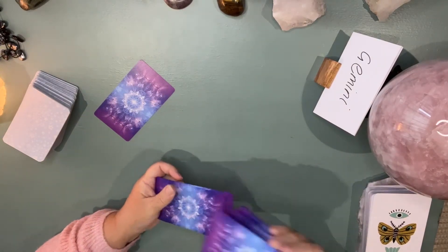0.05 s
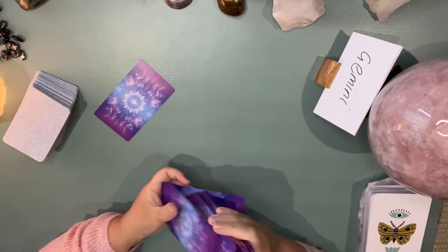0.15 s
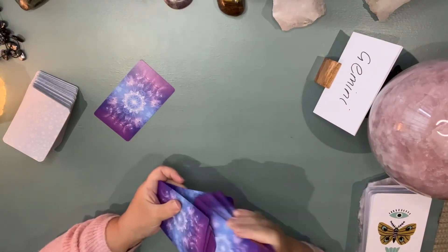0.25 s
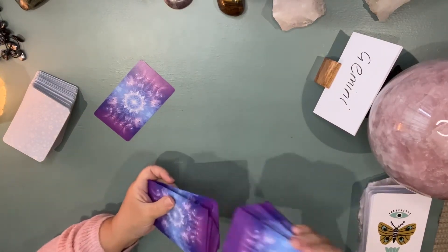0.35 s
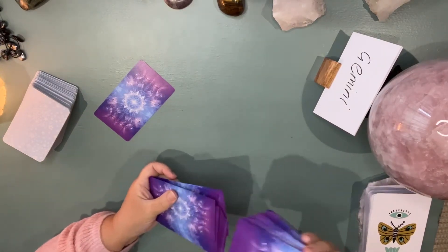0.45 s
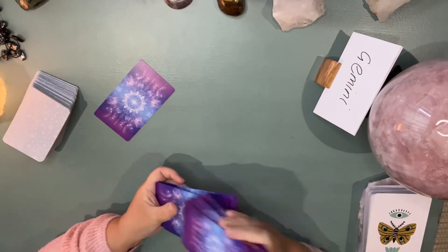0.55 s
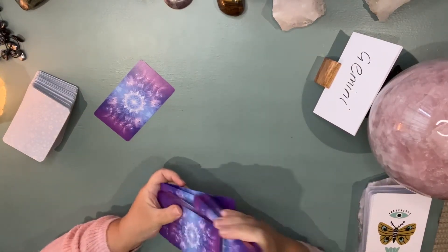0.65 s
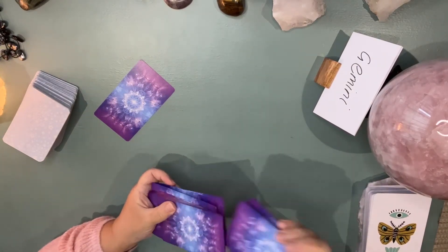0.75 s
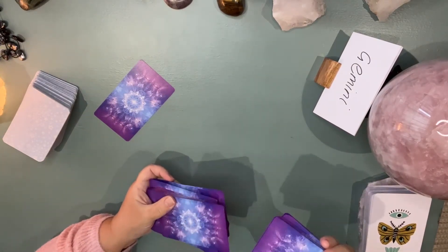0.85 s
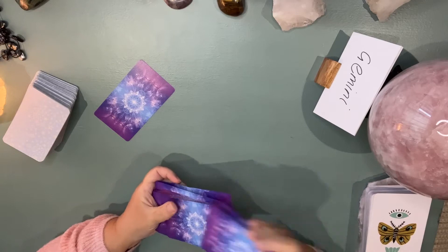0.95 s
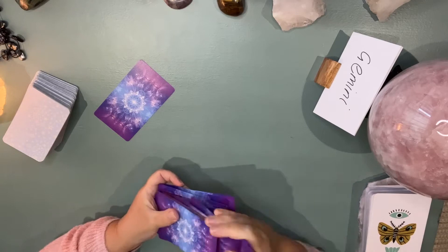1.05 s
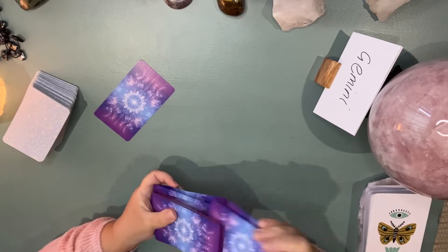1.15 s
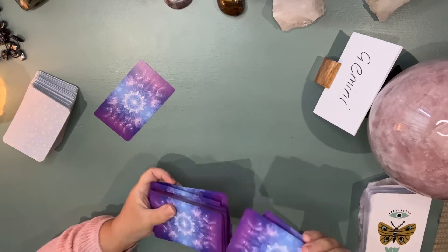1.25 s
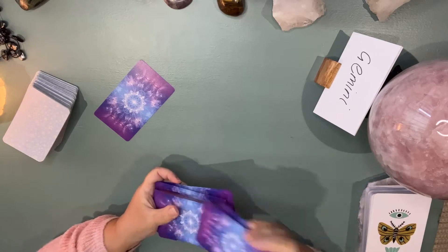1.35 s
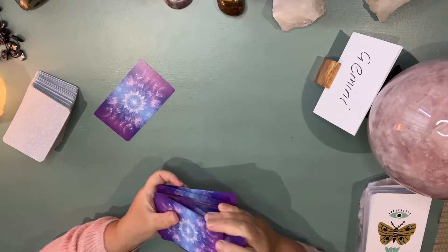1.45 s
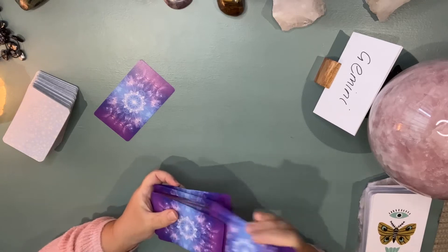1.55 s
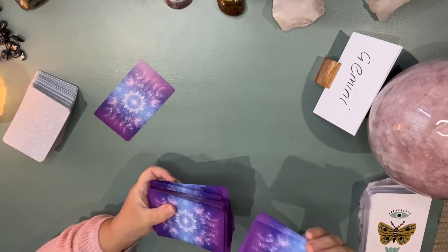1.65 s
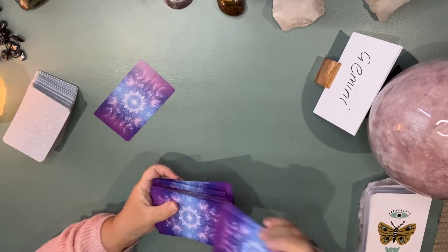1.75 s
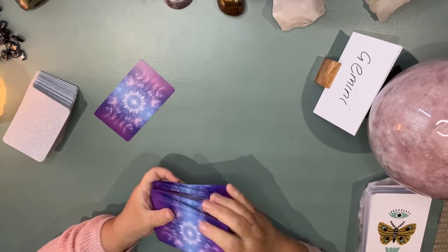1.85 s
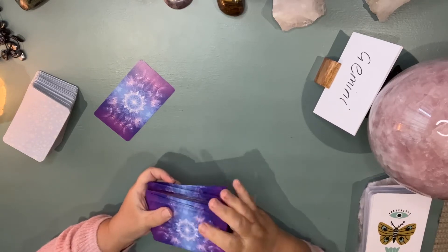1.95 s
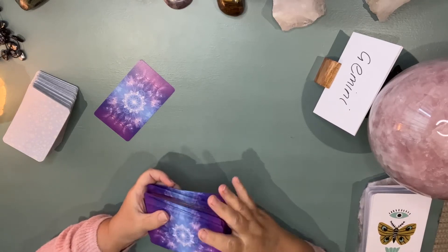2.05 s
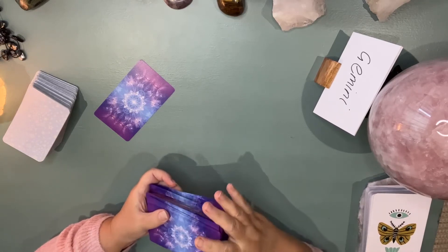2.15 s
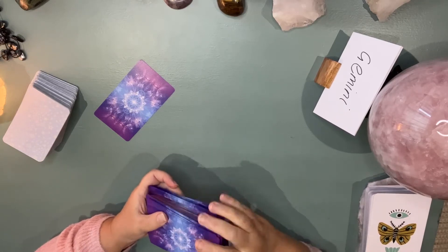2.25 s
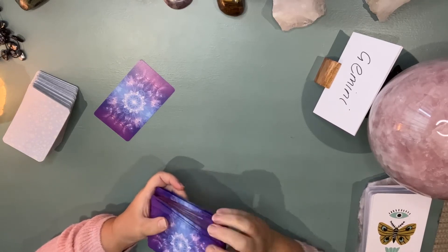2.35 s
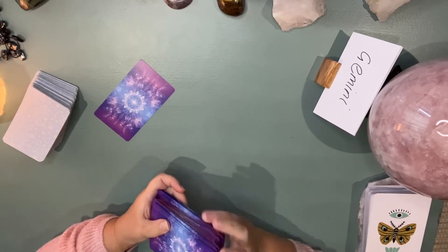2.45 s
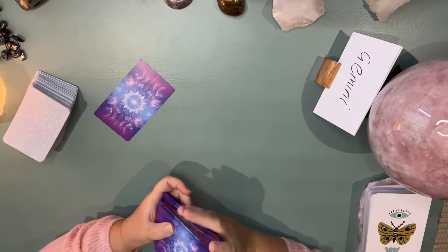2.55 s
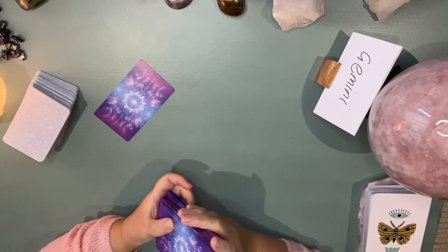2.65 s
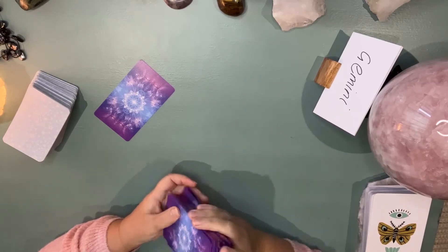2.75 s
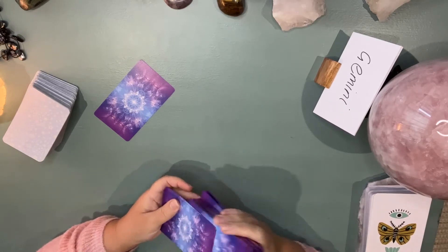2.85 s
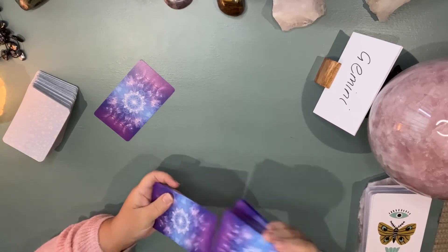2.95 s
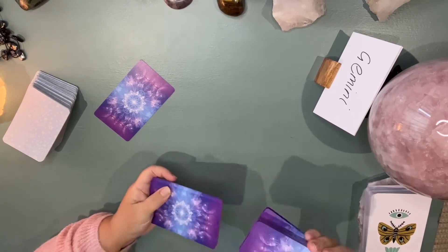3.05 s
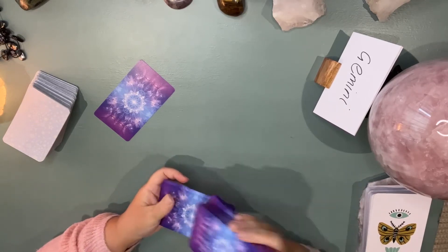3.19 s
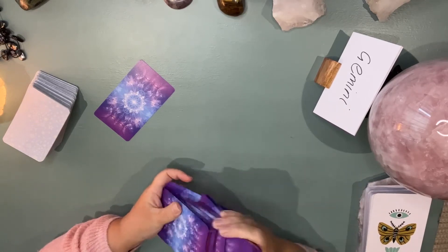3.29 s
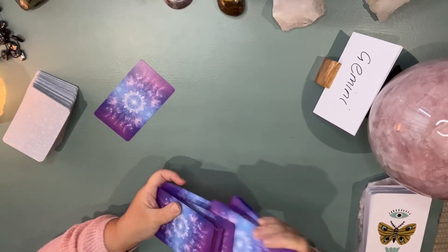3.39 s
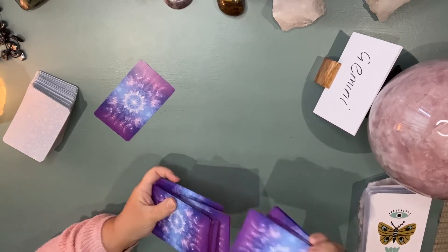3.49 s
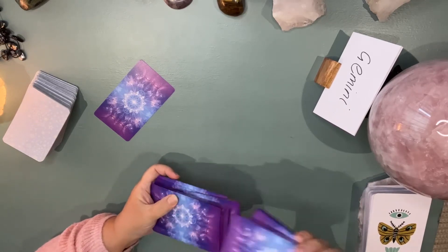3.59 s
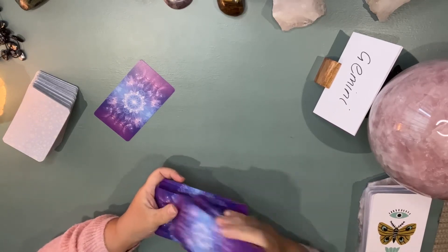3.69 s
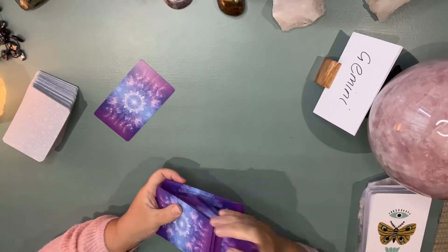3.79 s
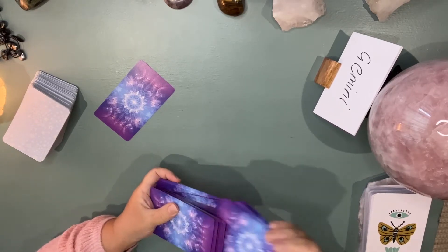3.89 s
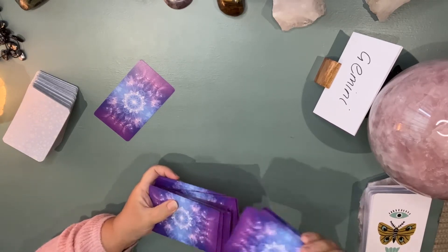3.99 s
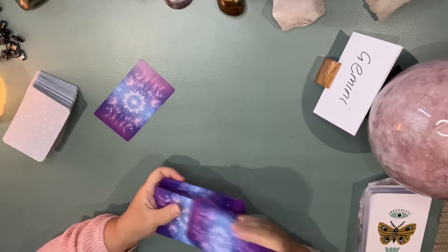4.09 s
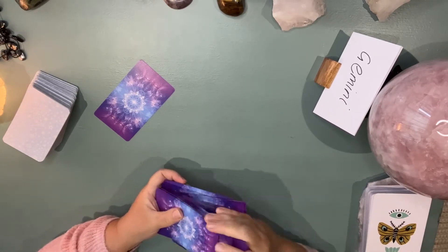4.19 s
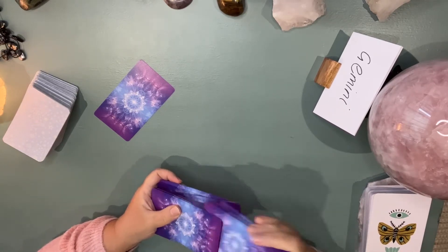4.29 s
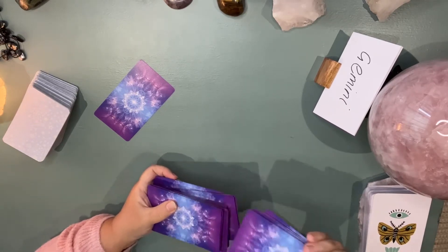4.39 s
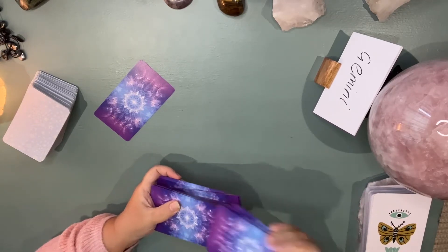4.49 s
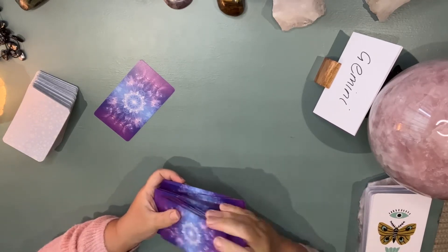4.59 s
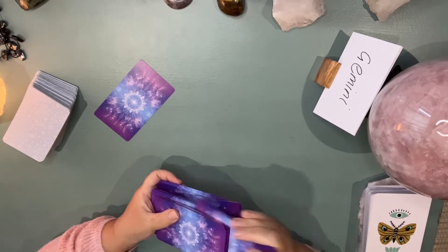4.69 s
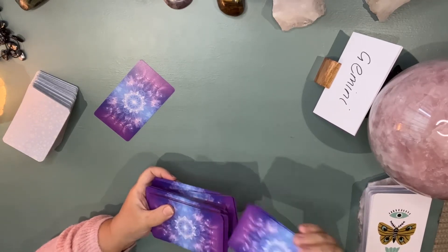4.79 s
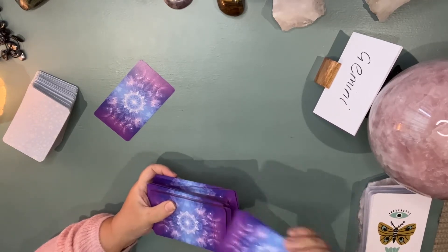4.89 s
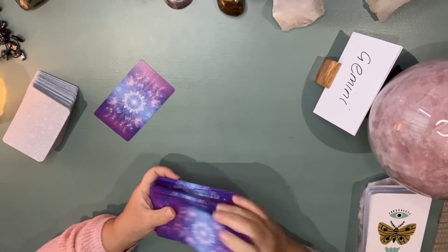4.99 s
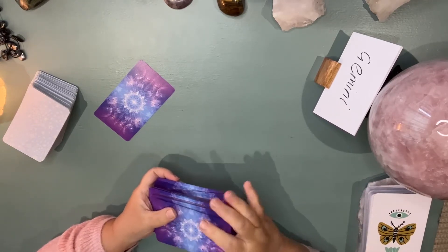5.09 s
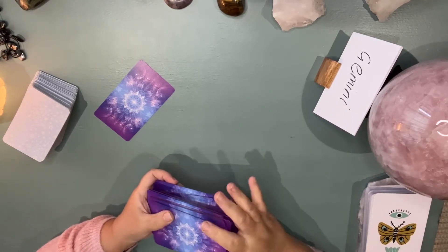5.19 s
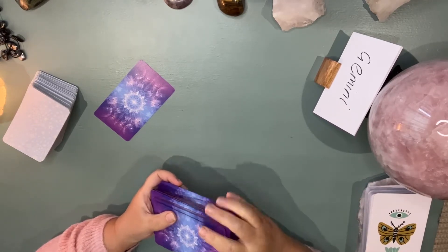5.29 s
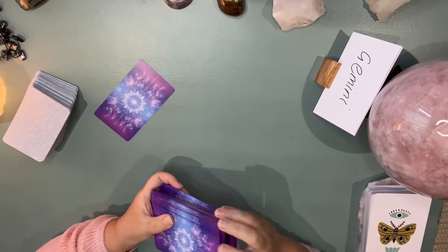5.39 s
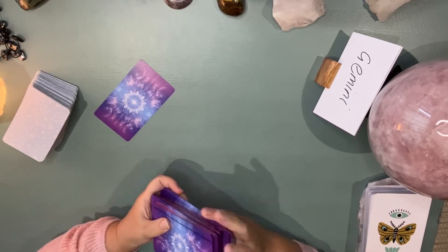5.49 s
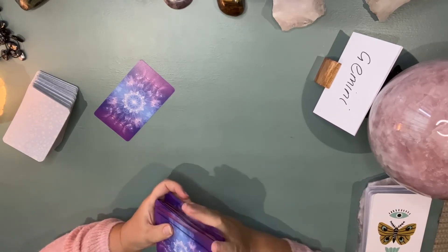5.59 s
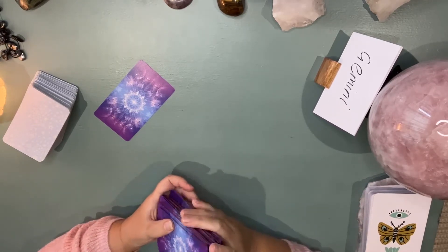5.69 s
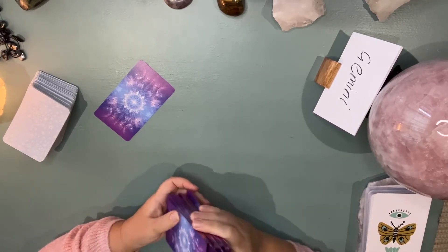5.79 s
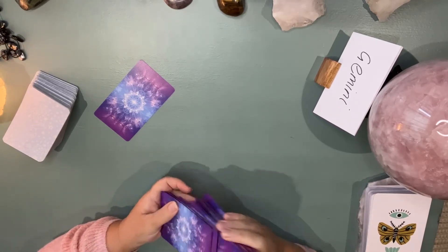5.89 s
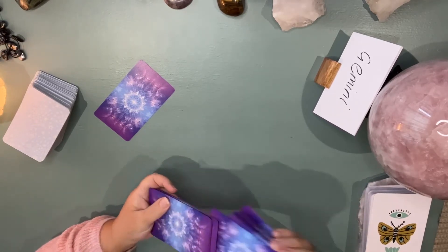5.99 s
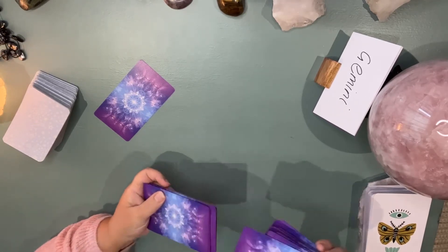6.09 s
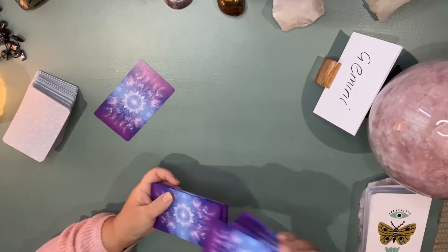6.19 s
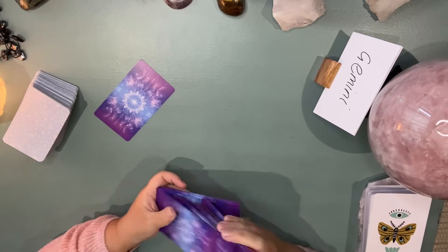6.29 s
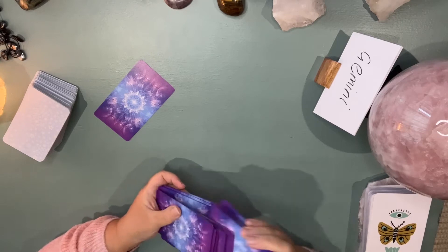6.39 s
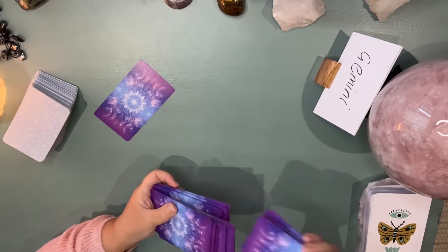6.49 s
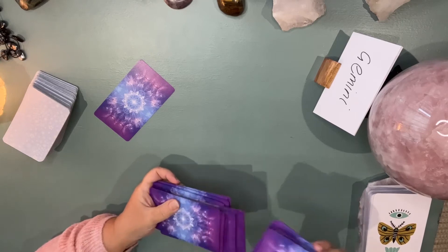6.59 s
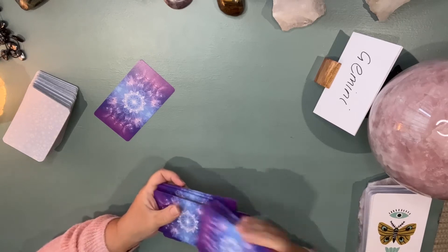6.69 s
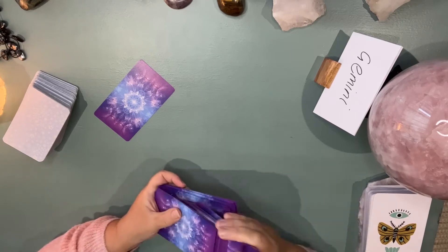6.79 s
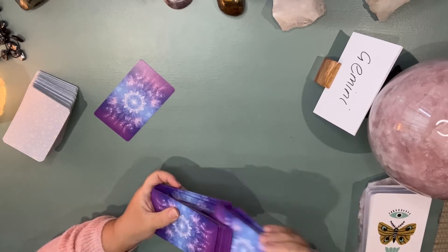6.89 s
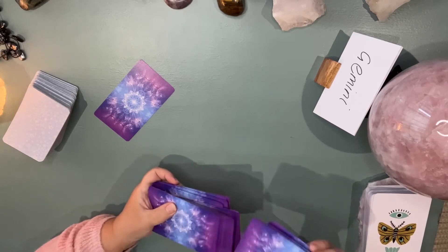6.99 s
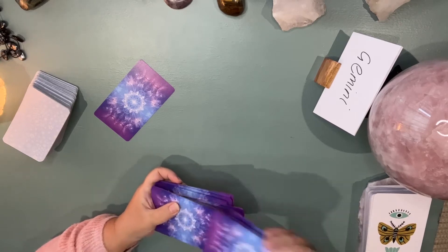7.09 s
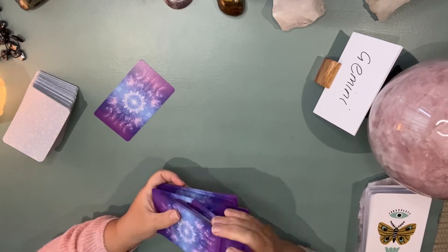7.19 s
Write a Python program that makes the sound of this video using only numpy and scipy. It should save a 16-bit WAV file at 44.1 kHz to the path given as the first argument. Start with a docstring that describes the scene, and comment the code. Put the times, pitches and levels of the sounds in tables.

```python
"""In a small soft room, two hands shuffle a deck of stiff glossy cards over a table, under a phone.
Packets slide together with a bright grainy hiss: noise that swells, sags and catches as the cards rub.
Edges slap and tick as short noise bursts through resonances; coarse drags stutter.
The deck thuds in the palm as waves that sink in pitch, and the table booms a little later.
The room rings on briefly as fading noise, over a faint hum of air made of coloured noise."""
import sys
import numpy as np
from scipy import signal
from scipy.fft import rfft, irfft, next_fast_len
from scipy.io import wavfile
from scipy.ndimage import uniform_filter1d

SR = 44100
rng = np.random.default_rng(int(sys.argv[2]) if len(sys.argv) > 2 else 0)


def wav_out(sig):
    """Save sig, one row per channel (or a flat mono array), as 16-bit PCM at SR to the path in sys.argv[1]."""
    wavfile.write(sys.argv[1], SR, np.round(np.clip(np.atleast_2d(sig).T, -1, 1) * 32767).astype(np.int16))


N = 319725
SIZE = next_fast_len(N + SR)  # transform length, with spare time at the end
HZ = np.arange(SIZE // 2 + 1) * SR / SIZE


def undb(db):
    """Turn decibels into a factor on the wave."""
    return 10 ** (np.asarray(db) / 20)


def level(x, db):
    """Set the rms level over all rows."""
    return x * undb(db) / np.sqrt(np.mean(x ** 2))


def colour(x, points):
    """Weight a sound's spectrum by a curve through (frequency [Hz], level [dB]) points."""
    hz, db = np.transpose(points)
    gain = undb(np.interp(np.log(HZ + 1), np.log(hz), db))
    return irfft(rfft(x, SIZE) * gain, SIZE)[..., :N]


def walk(rate):
    """Wander between random levels, rate [Hz] of them a second, with a spread a little under 1."""
    hold = int(SR / rate)
    steps = np.repeat(rng.standard_normal(N // hold + 1), hold)
    return uniform_filter1d(steps, hold)[:N]


def ring(x, hz, sharp):
    """Let one resonance respond to a sound; a higher sharpness rings longer."""
    b, a = signal.iirpeak(np.clip(hz, 30, 9000), sharp, SR)
    return signal.lfilter(b, a, x)


def bursts(s, db, hz, length, sharp, rise, knock_db, size):
    """Short contacts: noise bursts through a resonance each, over a broad knock.

    length [s] is the time to fade by 40 dB, rise a share of it; size [samples] is the room for each burst."""
    out, t = np.zeros((2, N + size)), np.arange(size) / SR
    for start, peak_db, pitch, fade_s, q in zip(*np.broadcast_arrays(s, db, hz, length, sharp)):
        attack = np.minimum(t / (rise * fade_s), 1) ** 2
        fade = np.exp(-np.log(100) * t / max(fade_s, .001))
        burst = rng.standard_normal((2, size)) * attack * fade
        knock_band = signal.butter(1, [pitch / 4, min(pitch * 3, 15000)], "band", fs=SR)
        knock = undb(knock_db) * signal.lfilter(*knock_band, burst)
        body = ring(ring(burst, pitch, max(q, .5)), pitch, 1.0) + knock
        i = int(start * SR)
        out[:, i:i + size] += undb(peak_db) * body / abs(body).max(axis=1, keepdims=True)
    return out[:, :N]


# the colour of the air hum: (frequency [Hz], relative level [dB per Hz])
AIR_COLOUR = [(25, -30), (45, -10), (68, -6.5), (110, -13.5), (300, -20.5), (1000, -27), (2500, -39),
              (6000, -40), (15000, -47)]
AIR_DB = -73  # rms


def air():
    """Faint hum of air: steady random pressure, strongest in the bass."""
    return level(colour(rng.standard_normal((2, N)), AIR_COLOUR), AIR_DB)


# how the room rings, band by band: (band centre [Hz], time to fade by 60 dB [s], level [dB])
ROOM_BANDS = [(114.5, 0.52, -2), (302, 0.37, 2.5), (491, 0.4, 3), (820, 0.39, 3.5), (2080, 0.52, 0.5),
              (4160, 0.44, -4.5), (8300, 0.34, -9.5), (13200, 0.25, -20.5)]


def room(x):
    """Dense reflections that start after a few ms and die sooner in the high treble."""
    t, tail = np.arange(SR) / SR, 0
    for hz, t60, db in ROOM_BANDS:
        edges = [hz / 2 ** .5, min(hz * 2 ** .5, .45 * SR)]  # one octave
        band = signal.butter(2, edges, "band", fs=SR, output="sos")
        arrival = np.clip((t - .003) / 0.00072, 0, 1)
        fade = np.exp(-np.log(1000) * t / t60) * arrival
        noise = signal.sosfilt(band, rng.standard_normal((2, SR)))
        tail = tail + undb(db) * noise * fade / np.sqrt(np.sum(fade ** 2))
    return irfft(rfft(x, SIZE * 2) * rfft(tail, SIZE * 2))[:, :N]


# the deck landing in the palm: (time [s], peak level [dB], starting pitch [Hz], table boom level [dB])
PALM_THUDS = [(0.178, -40.5, 500, -47.5), (0.311, -52, 750, -57), (0.45, -52.5, 300, -49.5),
              (0.73, -39, 697, -82), (1.043, -50, 447, -52), (1.335, -48, 750, -59),
              (1.573, -49.5, 604, -56), (1.883, -46.5, 355, -45), (1.917, -49, 590, -53.5),
              (2.921, -43, 950, -80), (3.223, -46.5, 775, -53), (3.396, -54.5, 336, -67),
              (3.448, -41.5, 730, -72), (3.7, -47, 930, -75), (3.908, -49, 300, -58), (4.32, -44, 750, -59),
              (4.519, -51.5, 644, -80), (4.898, -64, 700, -70), (4.947, -46.5, 720, -59),
              (5.994, -44.5, 840, -74), (6.269, -48.5, 760, -57), (6.301, -47.5, 543, -61),
              (6.448, -55.5, 298, -61), (6.659, -57, 650, -54), (6.703, -44.5, 776, -59),
              (7.092, -39, 846, -51.5)]
# counted in cycles of the starting pitch: until the pitch halves, and until the fade reaches 9 dB
SINK_CYCLES, FADE_CYCLES = 1.77, 2.12
TABLE_HZ = 77.3


def thuds():
    """Dull blows of the deck on skin that sink in pitch as the flesh yields; the table booms later."""
    size = 4096
    palm, t = np.zeros(N + size), np.arange(size) / SR
    for s, db, hz, _ in PALM_THUDS:
        cycles = t * hz
        fade = np.sqrt(cycles) * np.exp(-cycles / FADE_CYCLES)
        wave = fade * np.sin(2 * np.pi * SINK_CYCLES * np.log1p(cycles / SINK_CYCLES))
        i = int(s * SR)
        palm[i:i + size] += undb(db) * wave / abs(wave).max()
    s, _, _, boom_db = np.transpose(PALM_THUDS)
    boom = bursts(s + 0.006, boom_db, TABLE_HZ, 0.17, sharp=0.78, rise=0.058, knock_db=-8.5, size=16384)
    return palm[:N] * [[1], [0]] + boom  # the palm goes to the shared row only


# a packet dragging coarsely across card edges:
# (time [s], level before the stutter [dB], ring [Hz], length [s])
EDGE_DRAGS = [(1.903, -51, 1000, 0.26), (2.647, -49, 1180, 0.054), (2.663, -50, 2140, 0.013),
              (2.684, -39.5, 2230, 0.051), (2.698, -49, 2350, 0.074), (5.05, -47, 1000, 0.045),
              (5.669, -42, 2140, 0.068), (5.69, -43, 2380, 0.061), (5.671, -57, 1140, 0.046),
              (5.723, -47, 1150, 0.032), (5.718, -41.5, 2260, 0.048), (5.733, -42.5, 2700, 0.058)]


def scuffs():
    """Coarse drags that stutter as edge after edge lets go."""
    drags = bursts(*np.transpose(EDGE_DRAGS), sharp=2.8, rise=0.15, knock_db=-9, size=16384)
    return drags * undb(3.2 * walk(120))


# card edges meeting: (time [s], peak level [dB], ring [Hz], treble crack against that peak [dB])
EDGE_SLAPS = [(0.085, -38, 1590, -13), (0.094, -38.5, 910, -1), (0.113, -24, 1280, -16),
              (0.119, -27, 2070, -29), (0.131, -33, 1930, 4), (0.149, -24, 1900, -22),
              (0.177, -35.5, 607, 7), (0.28, -31, 596, 1.5), (0.299, -28.5, 2200, -21),
              (0.307, -25, 770, 1.5), (0.477, -45, 1080, -1.5), (0.516, -26, 1390, -27),
              (0.705, -32, 2100, -7.5), (0.721, -25, 3060, -24.5), (0.729, -24.5, 1440, -32),
              (0.937, -37.5, 1640, -28), (1.002, -21.5, 3050, 4.5), (1.333, -41, 393, -1),
              (1.564, -30.5, 1520, 2), (1.738, -39.5, 506, -17), (1.813, -34.5, 980, -8),
              (1.892, -39.5, 910, -11), (1.915, -36.5, 620, -17.5), (2.913, -36, 3750, -10),
              (2.92, -22.5, 2300, -36), (3.219, -18.5, 3700, 0.5), (3.229, -27.5, 1690, 9),
              (3.249, -28, 2040, -19.5), (3.378, -23.5, 2730, 3.5), (3.387, -31, 1980, -6),
              (3.447, -25.5, 2050, -2.5), (3.451, -38.5, 1070, -6), (3.494, -39, 1470, -6),
              (3.696, -30, 2180, -9), (3.901, -39, 1880, -13), (4.311, -39, 3120, 0),
              (4.089, -51.5, 1900, -10), (4.477, -47, 605, -63), (4.753, -34, 1400, 2.5),
              (4.783, -51, 1100, -30), (4.897, -39, 427, -1), (4.922, -43, 830, -3),
              (5.325, -48.5, 870, -2), (5.52, -51, 4050, 10), (5.993, -37, 1820, 8), (6.201, -45, 450, -23),
              (6.239, -45, 680, -17), (6.273, -33, 1980, -20), (6.3, -41, 960, -13),
              (6.445, -38.5, 2530, -4), (6.656, -40.5, 540, -19), (6.926, -30.5, 1840, -22),
              (7.07, -37, 585, -6)]
SLAP_S, CRACK_S = 0.01, 0.0049  # times to fade by 40 dB


def slaps():
    """Edge contacts: a short ring of the flexing packet and a treble crack."""
    s, db, hz, crack_db = np.transpose(EDGE_SLAPS)
    body = bursts(s, db, hz, SLAP_S, sharp=3.6, rise=0.25, knock_db=-3.0, size=2048)
    crack = bursts(s, db + crack_db, 4400, CRACK_S, sharp=1.0, rise=0.25, knock_db=-1.5, size=2048)
    return body + crack


def grit(spread_db):
    """Tiny slips of one surface over another, a few much larger than the rest; one row for each path."""
    sizes_db = spread_db * np.minimum(rng.exponential(size=N), 4)
    return rng.standard_normal((2, N)) * undb(sizes_db)


def patchy(x, depth_db, rate):
    """Each fifth of an octave wanders in level at random, giving the hiss an uneven, shifting colour."""
    spectrum, out = rfft(x, SIZE), 0
    place = np.clip(5 * np.log2(HZ / 1000 + 1e-9), 1, 19)  # the end bands take all that lies beyond
    for band in range(1, 20):
        share = np.clip(1 - abs(place - band), 0, 1)
        out = out + undb(depth_db * walk(rate)) * irfft(spectrum * share, SIZE)[:, :N]
    return out


# the colour of the duller scrape under the hiss: (frequency [Hz], relative level [dB per Hz])
SCRAPE_COLOUR = [(150, -30), (400, -14.5), (1000, -18), (1500, -5), (2200, 0), (3500, 4), (5500, 5.5),
                 (8000, 0), (12000, -9.5)]
NICKS_PER_S, NICKS_DB = 500, -4  # rms level against the smooth scrape


def nicks():
    """Single card edges snag: scattered dull ticks of uneven size."""
    snags = (rng.random(N) < NICKS_PER_S / SR) * undb(11 * rng.random(N))
    tick = rng.standard_normal((2, 48)) * np.exp(-np.arange(48) / 12)  # about 1 ms
    ticks = signal.oaconvolve(snags[None], tick)[:, :N]
    return level(colour(ticks, SCRAPE_COLOUR), NICKS_DB)


# the colour of the bright hiss: (frequency [Hz], relative level [dB per Hz])
HISS_COLOUR = [(3000, -39.5), (5500, -9), (8500, -1), (11500, 0), (13000, 5.5), (15800, -2)]
# each swell of pressure as card faces rub: (touch time [s], swell [s], ease [s],
# hiss level at the crest before the catching [dB], sag until the lift [dB], scrape against the hiss [dB])
FACE_RUBS = [(0.079, 0.018, 0.025, -56.5, -6, 1), (0.118, 0.017, 0.037, -33, 23, -10),
             (.155, 0.014, 0.14, -54.5, -3.5, -8.5), (0.51, 0.015, 0.076, -45.5, 3.5, -5),
             (.55, 0.035, 0.052, -37.5, 27, -11.5), (.612, 0.019, 0.078, -47, -8, -10),
             (0.931, 0.074, 0.089, -41.5, 43, -5), (1.023, 0.023, 0.12, -44.5, 12, -6.5),
             (1.316, 0.025, 0.024, -45, -3.5, -14), (1.364, 0.037, 0.036, -40, 44, -6),
             (1.413, 0.075, 0.1, -44, 21, -9), (1.734, 0.0078, 0.0081, -42, 2.5, -10.5),
             (1.755, 0.009, 0.042, -39, 14, -12.5), (1.811, 0.009, 0.013, -37.5, 14, -10),
             (2.163, 0.056, 0.12, -47.5, 23, -4), (2.375, 0.024, 0.05, -62.5, 9, -32),
             (2.449, 0.035, 0.059, -55, 25.5, -7.5), (2.55, 0.016, 0.096, -64.5, 21, 0.5),
             (2.634, 0.024, 0.06, -58, 4.5, 4), (2.693, 0.067, 0.2, -47.5, 8, -19.5),
             (2.885, 0.03, 0.02, -46, 19, -13.5), (3.148, 0.027, 0.04, -50.5, 0.5, 1),
             (3.221, 0.013, 0.069, -34.5, 30.5, -8.5), (3.28, 0.063, 0.074, -44.5, 4, -20),
             (3.385, .01, 0.058, -53.5, 18, -3), (3.46, 0.02, 0.055, -65, 0, 4),
             (3.631, 0.0072, 0.074, -36, 7.5, -10.5), (3.66, 0.023, 0.076, -41, 8, -4),
             (3.735, 0.024, 0.055, -39.5, 2, -13.5), (3.815, 0.0094, 0.036, -44, -0.5, -16.5),
             (4.034, 0.018, 0.035, -38, 1.5, -12), (4.075, 0.039, 0.027, -37.5, 18, -10.5),
             (4.14, 0.038, 0.13, -42, 15.5, -11.5), (4.474, 0.0095, 0.0076, -49, -17.5, -21),
             (4.511, 0.0055, 0.063, -34, 8.5, -14), (4.591, 0.066, 0.074, -40, 19, -15.5),
             (4.899, 0.0076, 0.011, -36.5, 4, -17), (4.921, 0.014, 0.12, -31.5, 38.5, -18.5),
             (5.07, 0.049, 0.021, -59.5, 25, -11.5), (5.155, 0.019, 0.033, -78.5, 27, 17),
             (5.21, 0.053, 0.1, -63, 25.5, 4), (5.429, 0.046, .008, -65, 0, -12),
             (5.482, 0.027, 0.017, -46, -4, -8), (5.55, 0.015, 0.16, -68.5, -2, 2),
             (5.733, 0.0062, 0.13, -59.5, -4, -6.5), (5.82, 0.052, 0.089, -50.5, -2, -24),
             (5.957, 0.026, 0.0082, -50.5, 9.5, -10), (6.195, 0.01, 0.03, -59, -13.5, -2),
             (6.223, 0.052, 0.041, -41, 1, -7.5), (6.32, 0.01, 0.11, -57, -1.5, -8.5),
             (6.655, 0.014, 0.012, -38.5, 11, -14), (6.676, 0.035, 0.041, -43.5, 2.5, -4.5),
             (6.765, 0.024, 0.098, -41.5, 30, -13), (6.886, 0.012, 0.024, -54.5, 13, -6),
             (7.069, 0.0068, 0.085, -46, -3, -9), (7.129, 0.038, 0.035, -40.5, 8, -8),
             (7.186, 0.026, .05, -43, -4, -8.5)]
SWELL_DB = 8.5  # how far under its crest a rub sets in
ROUNDNESS = 1.265  # 1 = pointed crest, 2 = a round one
# a rub fades in over a share of its swell, or over a fixed few ms if a slap falls within 10 ms
# of its start, and fades out as it lifts
GRIP_SHARE, STRUCK_GRIP_S, LIFT_S = 0.49, 0.0047, 0.0095


def slides():
    """Card faces rub: pressure swells, sags and lifts, and catches many times a second."""
    time = np.arange(N) / SR
    hiss_power, scrape_power = np.zeros(N), np.zeros(N)
    for s, swell, ease, hiss_db, sag_db, scrape_db in FACE_RUBS:
        crest, lift = s + swell, s + swell + ease
        near = slice(int(s * SR), int((lift + LIFT_S) * SR))
        t = time[near]
        struck = min(abs(slap[0] - s) for slap in EDGE_SLAPS) < .01
        grip_s = STRUCK_GRIP_S if struck else GRIP_SHARE * swell
        touch = np.clip(np.minimum((t - s) / grip_s, (lift - t) / LIFT_S + 1), 0, 1)
        away = np.interp(t, [s, crest, lift], [1, 0, 1]) ** ROUNDNESS  # 0 at the crest
        under_db = away * np.where(t < crest, SWELL_DB, sag_db)
        hiss_power[near] += (touch * undb(hiss_db - under_db)) ** 2
        scrape_power[near] += (touch * undb(hiss_db + scrape_db - under_db)) ** 2
    catch = undb(1.5 * walk(60) + 1.5 * walk(250))
    slips = patchy(grit(spread_db=2.2), depth_db=4.6, rate=22)
    hiss = np.sqrt(hiss_power) * level(colour(slips, HISS_COLOUR), 0)
    scrape = np.sqrt(scrape_power) * (level(colour(slips, SCRAPE_COLOUR), 0) + nicks())
    return catch * (hiss + scrape)


# the two microphone ports: (frequency [Hz], phase the left one leads by [rad],
# likeness [0-1], left minus right level [dB])
PORT_CURVES = [(60, 0, 0.7, -0.5), (199, 1, 0.13, -1), (634, 0.2, 0.26, -1.5), (1980, -1.14, 0.4, 0.5),
               (4260, -2, 0.32, -2.5), (6540, -2.5, 0.5, -5), (8025, -3, 1, 2), (10560, -1, 1, -1.5),
               (12450, 0.62, 1, 0.5), (14020, 2, 0.95, -1), (14550, np.pi, 1, 1.5)]


def ports(shared, apart):
    """What both ports share arrives shifted in phase; the rest differs in sign between them."""
    hz, *columns = np.transpose(PORT_CURVES)
    lead, like, pan_db = (np.interp(HZ, hz, column) for column in columns)
    like, side = np.clip(like, 0, 1), np.array([[1], [-1]])  # left, right
    common = np.sqrt((1 + like) / 2) * rfft(shared, SIZE)
    opposed = side * np.sqrt((1 - like) / 2) * rfft(apart, SIZE)
    shift = np.exp(.5j * side * lead) * undb(side * pan_db / 2)
    return irfft((common + opposed) * shift, SIZE)[:, :N]


def scene():
    """Add the sources, let them ring in the room over the air, and pick them up at both ports."""
    # row 0 is what both ports share; row 1 takes paths scattered by fingers, deck and table top
    blows = (thuds() + scuffs() + slaps()) * undb([[0], [-5]])  # a blow scatters less than a wide slide
    rubs = slides()
    wet = room(rubs + undb(-8.5) * blows)
    shared, apart = air() + wet + blows + rubs
    return ports(shared, apart)


TOP_HZ = 15750


def record(dry):
    """The phone cuts the top with a steep low-pass."""
    low_pass = signal.ellip(10, .2, 80, TOP_HZ, fs=SR, output="sos")
    return signal.sosfilt(low_pass, dry)


dry = scene()
out = record(dry)
wav_out(out)
```